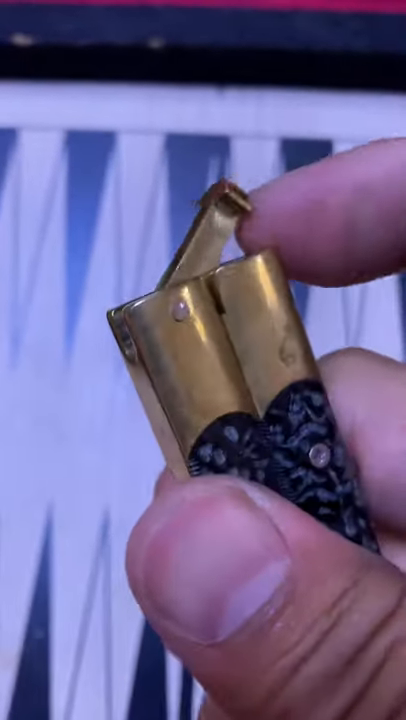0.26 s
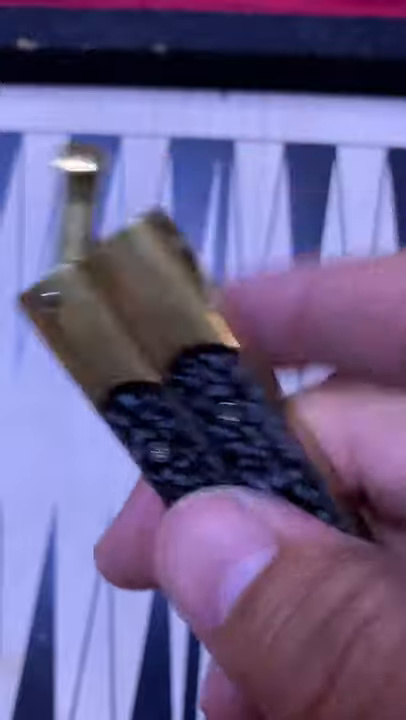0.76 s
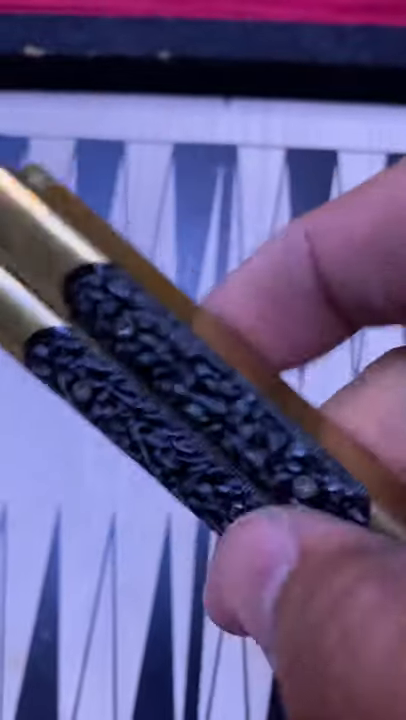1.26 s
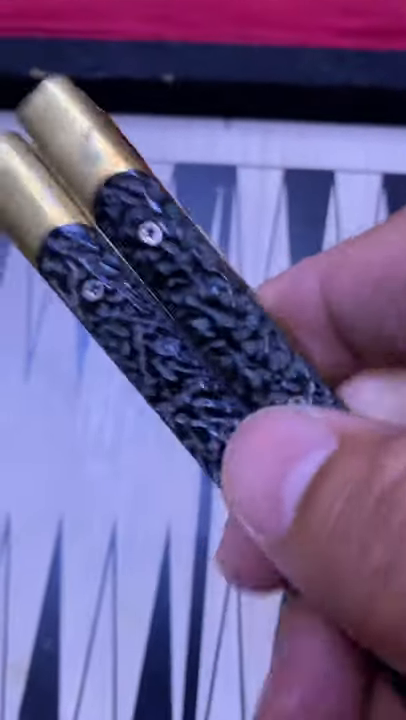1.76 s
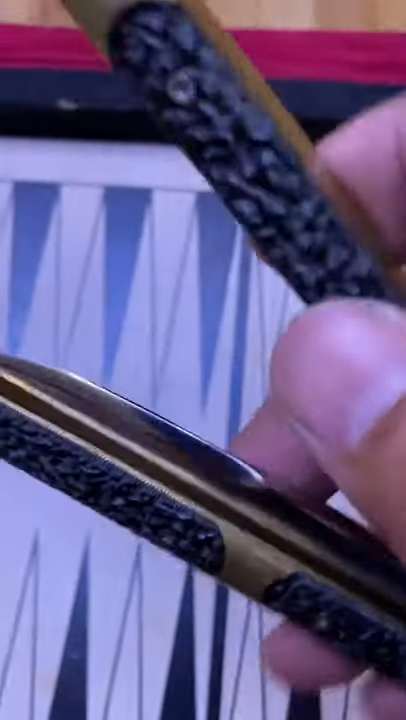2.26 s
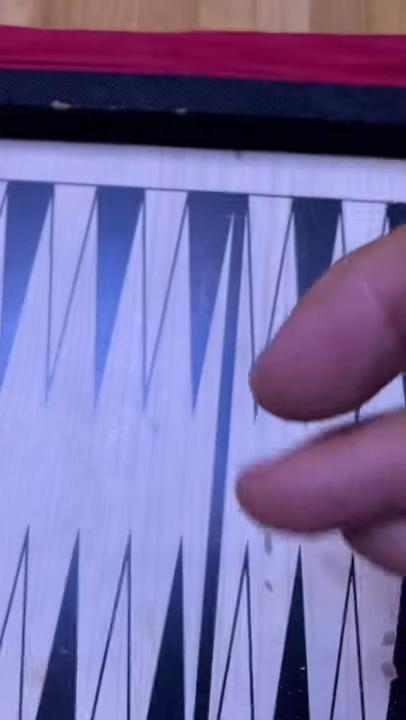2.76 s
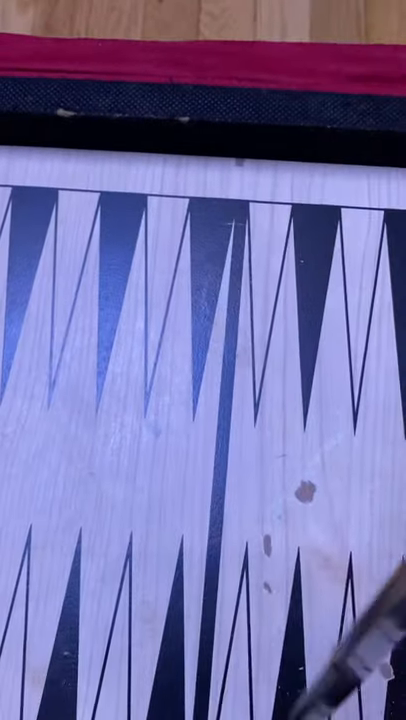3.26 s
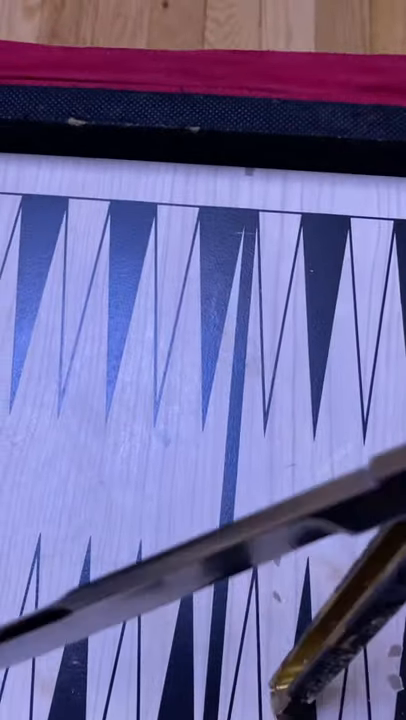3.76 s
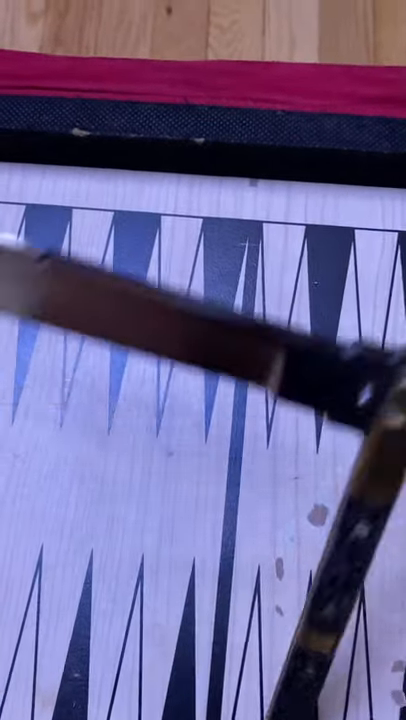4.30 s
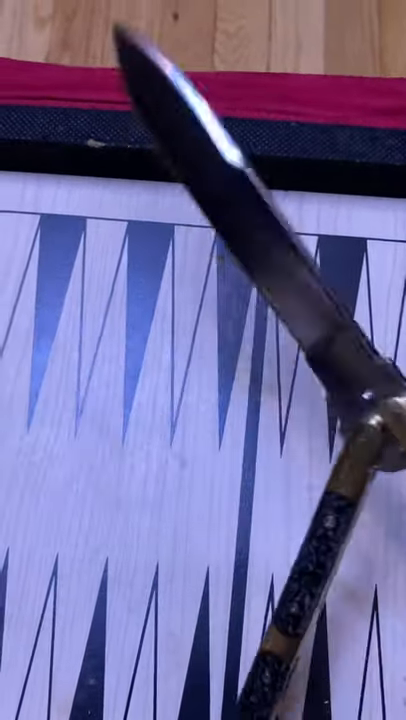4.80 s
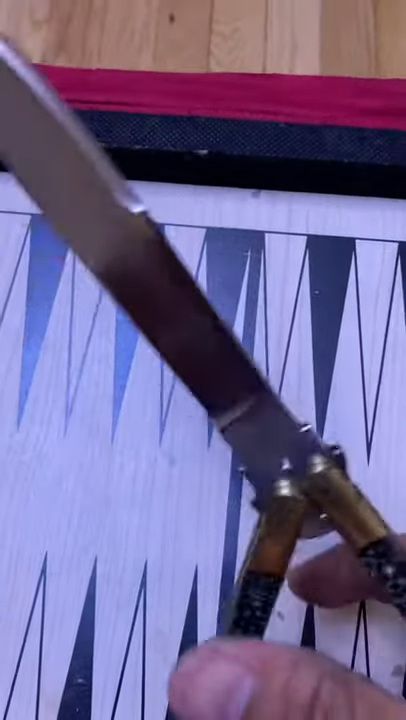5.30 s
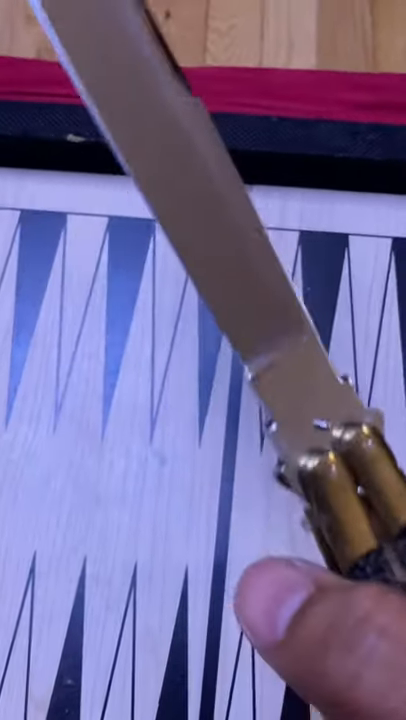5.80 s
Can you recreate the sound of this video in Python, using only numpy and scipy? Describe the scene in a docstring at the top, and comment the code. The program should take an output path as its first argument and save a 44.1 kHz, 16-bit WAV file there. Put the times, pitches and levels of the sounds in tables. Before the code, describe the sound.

A hand opens a metal butterfly knife over a wooden game board. Tiny clicks come first, then a bright snap, a pause, and the loudest hit, metal and wood together. Irregular knocks, jingling pivots and brief drags follow before the handles close with a crisp snap. Close wide stereo handheld microphone, faint room echo, low room air, muffled thuds of the hand on the camera.

```python
"""A low murmur of room air and a soft bump of the hand on the camera, then the latch of a brass-handled
butterfly knife clicks as it is pushed free and the handles part. One handle drops on a wooden game board,
bounces, skids and drags; the handles close behind the open blade. Fingers rub the grip; a small room answers.
Metal and wood are noise bursts and decaying modes, scraping is random slips through resonances,
skin, bumps and air are shaped noise, and the room is sparse random echoes."""
import sys
import numpy as np
from scipy import signal
from scipy.fft import rfft, irfft
from scipy.io import wavfile
from scipy.ndimage import uniform_filter1d

SR = 44100
rng = np.random.default_rng(int(sys.argv[2]) if len(sys.argv) > 2 else 0)


def to_wav(sig):
    """Store sig (one row per channel, or 1-D mono) as 16-bit WAV at the path in sys.argv[1].

    Samples outside -1..1 are clipped; the rate is SR.
    """
    pcm = np.clip(np.atleast_2d(sig), -1, 1) * 32767
    pcm = np.round(pcm).astype(np.int16)
    wavfile.write(sys.argv[1], SR, pcm.T)  # frames by channels


N = 266496  # samples

# Levels in dB are relative; the mix sets the final gains.
# metal clicks: latch freed, handles part, one drops and bounces, pivots rattle, handles close:
# start_s, level_db, brightness_db_per_band, favoured_ring_hz, second_ring_hz, chatter_t60_s
METAL_CLICKS = [ (0.293, -49, 0.5, 11400, 3300, 0.014), (0.2978, -44.5, -3.5, 6570, 3400, 0.013),
                (1.105, -44, 2.5, 12000, 5160, 0.0093), (1.1126, -49.5, -5, 4450, 5500, 0.034),
                (1.157, -53, -0.5, 3970, 5800, .018), (1.167, -51, 3, 5030, 15300, 0.022),
                (1.175, -47, -4.5, 3950, 4900, 0.016), (1.186, -44.5, -1.5, 4100, 5160, 0.012),
                (1.5323, -56, -8.5, 3800, 5100, 0.014), (1.88, -47.5, -5.5, 3930, 5240, .033),
                (1.897, -28, -1, 5450, 3940, 0.017), (1.904, -42, 3.5, 5300, 7060, .012),
                (2.511, -59.5, -5.5, 3450, 4116, .02), (2.548, -56, -3, 9140, 3930, .018),
                (2.626, -58.5, -2, 6630, 8100, 0.012), (2.822, -43, 3, 9030, 10400, 0.011),
                (2.832, -48.5, 4.5, 10100, 11030, 0.016), (3.1622, -21.5, 0, 10370, 6660, 0.02),
                (3.168, -30, 1.5, 6730, 9350, 0.022), (3.1819, -38.5, -2, 10750, 4170, .04),
                (3.281, -48, -0.5, 6740, 8520, 0.015), (3.2865, -53, 3.5, 10200, 8450, 0.028),
                (3.58, -32, 7.5, 10440, 12300, 0.011), (3.587, -39, 2, 8530, 3500, 0.022),
                (3.5915, -38, 6, 10400, 6600, .03), (3.602, -43.5, -2.5, 10460, 6650, .02),
                (3.6325, -52, 1, 8470, 10400, .02), (3.6659, -41.5, 2.5, 8370, 10200, 0.012),
                (3.8557, -36.5, 3, 10410, 8400, 0.023), (4.2757, -57.5, 2.5, 8430, 3980, .015),
                (4.4273, -42.5, 1.5, 7530, 8500, .02), (4.464, -30.5, -0.5, 10400, 5250, 0.01),
                (4.4704, -30.5, 4, 7560, 5170, 0.009), (4.476, -31, 1.5, 12090, 5260, 0.012),
                (4.739, -49, -2, 7000, 5260, 0.014), (4.7476, -38.5, 0.5, 10500, 6980, 0.027),
                (4.876, -36.5, 0, 7640, 4120, 0.022), (4.907, -41, 2.5, 6850, 5330, 0.033),
                (4.927, -43.5, -2.5, 6660, 3960, 0.062), (4.966, -55, 1, 4000, 8470, .02),
                (5.0216, -47, 5.5, 10600, 4070, 0.0095), (5.13, -59, 0, 7000, 5170, 0.011),
                (5.6237, -37, 1.5, 6000, 10700, 0.024), (5.6416, -32.5, -1.5, 7150, 5280, 0.037),
                (5.655, -44.5, -2, 8830, 5270, .02), (5.81, -49.5, 0, 7260, 5900, 0.016),
                (5.8466, -23.5, 2, 6480, 9580, 0.0065)]
# limits of the three click bands: edge_hz
CLICK_EDGES_HZ = [3300, 5800, 9000, 17000]
# level of the low, middle and high band of an even click: level_db
CLICK_BAND_DB = (-1.3, -0.45, 0.1)
# nominal modes of the knife: mode_hz, level_db
KNIFE_MODES = [(3450, -3), (4080, -1), (5250, -4), (6080, -10), (6540, -0.5), (6790, -2), (7560, -3.5),
               (8470, -2), (9450, -2), (10350, 2), (10720, -0.5), (11950, -3.5), (12500, -6), (15200, -7)]
# layers of the board knocks; rows a few ms apart sound as one knock:
# start_s, clack_db, boom_db, clack_centre_hz, spot_ring_db
KNOCK_LAYERS = [(3.1613, -14.5, -44.5, 1720, -14), (3.1625, -19.5, -42, 920, -3),
                (3.165, -23, -29.5, 762, 1), (3.5785, -18.5, -40, 983, -7.5), (3.5795, -27.5, -46, 1600, 0),
                (3.583, -29.5, -28, 737, -4), (3.857, -40.5, -48.5, 850, -5), (4.422, -36.5, -51, 807, -2),
                (4.4647, -27, -34, 1005, -6), (4.468, -33, -50.5, 1600, -0.5),
                (4.4715, -25, -44.5, 683, 16), (4.4769, -42, -32, 677, 4), (4.7403, -28, -40.5, 1024, 3),
                (4.878, -32, -63.5, 850, 8.5), (4.909, -39, -60.5, 1000, 1), (4.929, -36.5, -58, 984, 1.5),
                (4.967, -32.5, -62, 900, 1), (4.982, -32.5, -44.5, 866, -5), (5.129, -37, -57.5, 960, 2)]
# clack modes of the board: mode_hz, level_db, t60_s
CLACK_MODES = [(670, 1.5, 0.14), (769, 5, 0.073), (889, 1.5, .1), (994, 3, 0.086), (1238, -4, 0.14),
               (1440, -6, 0.092), (1555, -4.5, 0.085), (1694, -4, 0.087), (1810, -5.5, .07),
               (2150, -10, .04)]
# hollow boom modes of the board: mode_hz, level_db, t60_s
BOOM_MODES = [(144.5, 2, 0.14), (181, -0.5, 0.064), (275, -3, 0.11), (400, -5, 0.034)]
# hand bumps camera: peak_s, level_db, bell_sigma_s, firmness_db
HAND_BUMPS = [(0.059, -30, .02, -4.5), (0.334, -32, .036, -2), (0.564, -34, .035, 4),
              (0.688, -34.5, 0.016, -14.5), (1.477, -37.5, .027, -4.5), (1.776, -27.5, 0.018, 4.5),
              (2.179, -34.5, .027, 3.5), (2.624, -35.5, 0.026, -16), (3.044, -26, 0.042, -2),
              (3.341, -28, 0.016, 0), (3.641, -29.5, 0.017, 3.5), (3.744, -29.5, .019, -0.5),
              (4.13, -31.5, .025, 2.5), (4.286, -35, 0.017, 4.5), (4.489, -34.5, .019, -2.5),
              (4.646, -31, .021, -2.5), (5.086, -34.5, 0.029, 2)]
# spectrum of a bump: freq_hz, level_db
BUMP_SPECTRUM = [(20, -14), (40, 0.5), (65, 8), (100, -3), (160, -18), (280, -18.5), (420, -39.5),
                 (1000, -37), (3000, -87)]
# handle scrapes board in short pulls: peak_s, level_db, bell_sigma_s, tilt_db_per_octave
DRAG_PULLS = [(4.333, -47.5, 0.055, -2.5), (4.434, -41, 0.039, -3), (4.74, -41, 0.033, 1),
              (4.91, -44, 0.053, 4), (5.028, -43, 0.041, 4), (5.144, -44.5, 0.021, 2)]
# board resonances driven by scraping: centre_hz, width_hz, level_db
SCRAPE_MODES = [(283.7, 32, -12), (668, 42, -9), (812, 63, -6), (1010, 52, -6), (1687, 52, -12.5)]
# fingers slide on grip: peak_s, level_db, bell_sigma_s
FINGER_RUBS = [(.86, -61.5, 0.063), (1.68, -69, 0.086), (2.9, -61.5, 0.034), (3.06, -56.5, 0.02),
               (4.14, -64.5, 0.042), (4.39, -62, .05), (4.81, -60, .04), (5.195, -62, 0.027),
               (5.61, -59.5, 0.022), (6.0, -60.5, 0.17)]
# spectrum of skin on grip: freq_hz, level_db
RUB_SPECTRUM = [(1000, -34), (3000, -10), (4000, 8.5), (5200, -4.5), (7000, 3), (9000, 4.5), (11000, 3),
                (13500, -2), (16000, -1.5)]
# spectrum of still room air: freq_hz, density_db_per_hz
AIR_SPECTRUM = [(20, -20.5), (65, -0.5), (110, -13.5), (190, -16.5), (290, -6), (420, -15.5), (620, -18),
                (780, -10), (1000, -19.5), (1500, -19.5), (2300, -27), (3200, -33.5), (5000, -43.5),
                (8000, -46), (15000, -55)]
# decay of the room: freq_hz, t60_s
ROOM_DECAY = [(150, 0.43), (1000, 0.32), (5000, 0.42), (12000, 0.46), (16000, 0.17)]
# spectrum of the room's echoes: freq_hz, level_db
ROOM_SPECTRUM = [(150, -14), (700, -3.5), (1500, -1.5), (2500, -4), (3900, -1.5), (4700, -2.5),
                 (5900, -5.5), (6700, -1), (7800, -5), (10500, -8), (12600, -13.5), (14000, -11)]
# phase between the two microphone ports: freq_hz, left_lead_rad
PORT_LEAD = [(95, -2.5), (135, -0.7), (320, -0.85), (550, -2), (1000, -2.5), (2500, -2.5), (3300, -2.5),
             (4000, -4), (5500, -2.5), (7000, -1.7), (8300, 0), (10000, 1.24), (11500, 3.0), (12700, 4),
             (14300, 5)]
# likeness of diffuse sound at the two ports: freq_hz, likeness_0_to_1
PORT_COHERENCE = [(60, 0.82), (200, 0.78), (300, 0.21), (700, 0.27), (1500, 0.58), (3000, 0.86),
                  (4000, 0.14), (5500, 0.98)]
# level of the left port over the right: freq_hz, difference_db
PORT_LEVEL_DIFFERENCE = [(60, -0.4), (170, -0.8), (350, 1), (640, -2.5), (1300, -0.7), (9000, 0.1)]
# hollow tocks of a struck handle: start_s, level_db, pitch_hz
HANDLE_TOCKS = [(0.297, -45, 2120), (1.107, -55, 2140), (1.896, -54, 2270), (2.511, -55.5, 1930),
                (2.823, -51, 1914), (3.857, -45, 2150), (4.465, -36, 2200), (5.624, -45, 2130),
                (5.643, -43.5, 2170), (5.847, -39, 1970)]
# squeal of the skidding handle: time_s, pitch_hz, level_db
SKID_PATH = [(3.175, 1558, -43), (3.2, 1446, -39.5), (3.222, 1301, -41), (3.238, 1427, -38),
             (3.252, 1412, -40.5), (3.285, 1380, -54.5)]

AIR_DB = -52.5
FAVOUR_DB = 5.5  # extra level of the band that holds the favoured ring
REBOUND_MIN_S, REBOUND_MAX_S, REBOUND_DB = 0.008, 0.021, -17.5
LEAD_IN_S, LEAD_IN_DB = 0.0046, -22
FIRM_HZ = 124  # firmness acts above this
GRIP_DETUNE = 0.008  # standard deviation, share of mode pitch
SPOT_DB = 2.5  # standard deviation of mode level from click to click


def amp(db):
    """Amplitude ratio from dB."""
    return 10 ** (np.asarray(db) / 20)


def rms(x):
    """Root mean square, kept above zero."""
    return np.sqrt(np.mean(x ** 2) + 1e-20)


def unit(x):
    """x at rms 1."""
    return x / rms(x)


def read(points, hz):
    """A table over frequency, joined on a log axis."""
    freq_hz, value = np.transpose(points)
    return np.interp(np.log(hz + 1), np.log(freq_hz + 1), value)


def add(mix, start_s, sound):
    """Adds sound to mix in place, cut at the end of mix."""
    part = mix[max(round(start_s * SR), 0):][:len(sound)]
    part += sound[:len(part)]


def colour(x, spectrum):
    """Multiplies the spectrum of x by a table, at rms 1."""
    gain = amp(read(spectrum, np.fft.rfftfreq(N, 1 / SR)))
    return unit(irfft(rfft(x) * gain, N))


def band(x, lo_hz, hi_hz, order=3):
    """Butterworth band-pass."""
    edges_hz = [lo_hz, min(hi_hz, SR / 2 - 1)]
    return signal.sosfilt(signal.butter(order, edges_hz, "band", fs=SR, output="sos"), x)


def low_pass(hz):
    """Second-order low-pass sections."""
    return signal.butter(2, hz, fs=SR, output="sos")


def around(x, hz, width_hz):
    """A damped resonance."""
    return signal.lfilter(*signal.iirpeak(hz, hz / width_hz, fs=SR), x)


def gliding(x, hz, width_hz):
    """A damped resonance that follows the pitch curve hz: shift to 0 Hz, smooth, shift back."""
    turn = np.exp(2j * np.pi * np.cumsum(hz) / SR)
    r = np.exp(-np.pi * width_hz / SR)
    return (turn * signal.lfilter([1 - r], [1, -r], x / turn)).real


def ring(modes, t, scatter_db):
    """Decaying modes; random shares stand for where the blow lands."""
    hz, db, t60_s = np.transpose(modes)[:, :, None]
    share_db, phase_turns = rng.standard_normal((2, len(modes), 1))
    level = amp(db + scatter_db * share_db - 60 * t / t60_s)
    return (level * np.sin(2 * np.pi * (hz * t + phase_turns))).sum(0)


def onset(t, rise_s):
    """Smooth rise from 0 to 1."""
    return 1 - np.exp(-(t / rise_s) ** 2)


def contact(t, hold_s, t60_s):
    """Two surfaces chatter as noise for hold_s, then settle exponentially."""
    decay = np.exp(-np.log(1000) * np.maximum(t - hold_s, 0) / t60_s)
    return rng.standard_normal(len(t)) * decay


def swells(rows):
    """Gain over time: each movement is a bell curve, overlaps add in power."""
    t = np.arange(N) / SR
    bells = [amp(db) * np.exp(-((t - peak_s) / sigma_s) ** 2 / 2) for peak_s, db, sigma_s in rows]
    return np.sqrt(sum(bell ** 2 for bell in bells))


def ports(x, other=None):
    """Left and right ports hear x out of phase; diffuse sound also has an unrelated part."""
    hz = np.fft.rfftfreq(N, 1 / SR)
    right = rfft(x)
    if other is not None:
        same = np.clip(read(PORT_COHERENCE, hz), 0, 1)
        right = same * right + np.sqrt(1 - same ** 2) * rfft(other)
    return np.array([x, irfft(right * np.exp(-1j * read(PORT_LEAD, hz)), N)])


def air():
    """Still room air: steady shaped noise, diffuse at the ports."""
    return amp(AIR_DB) * ports(*colour(rng.standard_normal((2, N)), AIR_SPECTRUM))


def thumps():
    """Each shift of the hand sends a dull shudder through the camera body; firm ones reach higher."""
    shudder = colour(rng.standard_normal((2, N)), BUMP_SPECTRUM)
    shudder /= np.sqrt(uniform_filter1d((shudder ** 2).mean(0), size=1500))  # evens out the level
    deep = signal.sosfiltfilt(low_pass(FIRM_HZ), shudder)
    push = swells([(s, db, sigma_s) for s, db, sigma_s, _ in HAND_BUMPS])
    firm = swells([(s, db + firm_db, sigma_s) for s, db, sigma_s, firm_db in HAND_BUMPS])
    return ports(*(push * deep + firm * (shudder - deep)))


def click_parts():
    """Each click is a faint lead-in, the click itself, and a weaker rebound a random moment later."""
    rows = []
    for (s, db, *tone), (wait, loss) in zip(METAL_CLICKS, rng.random((len(METAL_CLICKS), 2))):
        rebound_s = s + REBOUND_MIN_S + wait * (REBOUND_MAX_S - REBOUND_MIN_S)
        rebound_db = db + REBOUND_DB * (1 + 0.5 * loss)
        rows += [(s - LEAD_IN_S, db + LEAD_IN_DB, *tone), (s, db, *tone), (rebound_s, rebound_db, *tone)]
    return rows


def clicks(hardness_hz=15500, mode_width_hz=300):
    """Metal chatters through the knife's modes, favouring two: (direct sound, sound sent to the room)."""
    t, out = np.arange(SR // 12) / SR, np.zeros((2, N))
    attack = t < 0.005
    bands = list(zip(CLICK_EDGES_HZ, CLICK_EDGES_HZ[1:]))
    rise = onset(t, rise_s=0.0011)

    def struck(x):
        """x at rms 1 over the attack."""
        return x / rms(x[attack])

    for s, level_db, bright_db, hz, second_hz, t60_s in click_parts():
        levels_db = [level_db + CLICK_BAND_DB[k] + bright_db * (k - 1) + FAVOUR_DB * (lo <= hz < hi)
                     for k, (lo, hi) in enumerate(bands)]
        chatter = contact(t, hold_s=0.0018, t60_s=t60_s) * rise
        steel = np.zeros(len(t))
        for (mode_hz, db), (spot, grip) in zip(KNIFE_MODES, rng.standard_normal((len(KNIFE_MODES), 2))):
            gripped_hz = mode_hz * (1 + GRIP_DETUNE * grip)
            steel += amp(db + SPOT_DB * spot) * around(chatter, gripped_hz, mode_width_hz)
        snap = struck(band(chatter, 1200, hardness_hz, order=4))
        crack = struck(steel) + amp(-7.5) * snap

        tap = contact(t, hold_s=0.00054, t60_s=0.011) * rise
        first_ring = struck(around(tap, hz, width_hz=130))
        second_ring = struck(around(tap, second_hz, width_hz=110))
        favoured = first_ring + amp(-5.5) * second_ring
        strike = crack + amp(0.5) * favoured
        # summed over all directions the modes even out
        scattered = crack + 0.5 * snap + amp(-11) * favoured

        # the low ring also shakes the grip
        body = band(contact(t, hold_s=0.00089, t60_s=0.025) * rise, 1700, 3900, order=2)
        add(out[0], s, amp(levels_db[0] - 19.0) * struck(body))
        for db, (lo_hz, hi_hz) in zip(levels_db, bands):
            for path, part in zip(out, band([strike, scattered], lo_hz, hi_hz, order=4)):
                add(path, s, amp(db) * struck(part))
    return out


def room(x, rise_s=0.0028, echoes_per_s=5000):
    """Sparse reflections that die at a speed set by frequency."""
    sparse = rng.random((2, SR)) < echoes_per_s / SR
    taps = rng.standard_normal((2, SR)) * sparse * onset(np.arange(SR) / SR, rise_s)
    hz, t, z = signal.stft(taps, SR, nperseg=256)
    decay = np.exp(-np.log(1000) * t / read(ROOM_DECAY, hz)[:, None])
    z *= amp(read(ROOM_SPECTRUM, hz))[:, None] * decay
    tail = signal.istft(z, SR, nperseg=256)[1]
    tail /= np.linalg.norm(tail[0])
    return ports(*signal.fftconvolve(x[None], tail, axes=1)[:, :N])


def tocks():
    """The hollow handle takes the blow and rings briefly, damped by the hand."""
    t, out = np.arange(SR // 12) / SR, np.zeros(N)
    for s, db, hz in HANDLE_TOCKS:
        blow = contact(t, hold_s=0.0015, t60_s=0.072)
        tock = around(around(blow, hz, width_hz=410), hz, width_hz=380)
        add(out, s, amp(db) * tock / rms(tock[t < 0.005]))
    return out


def rub(grain_db=2.2):
    """Skin hisses on the grip, catching in quick grains under a pressure that varies more slowly."""
    catch = unit(uniform_filter1d(rng.standard_normal(N), size=200))
    pressure = unit(uniform_filter1d(rng.standard_normal(N), size=1800))
    hiss = rng.standard_normal(N) * amp(grain_db * (catch + 0.5 * pressure))
    return swells(FINGER_RUBS) * colour(hiss, RUB_SPECTRUM)


def knocks(ring_t60_s=0.054, reach=1.72):
    """The board clacks around each layer's pitch and rings at it; its hollow boom rises more slowly."""
    t, out = np.arange(SR // 3) / SR, np.zeros(N)
    early, late = t < 0.006, t < 0.03
    for s, clack_db, boom_db, hz, ring_db in KNOCK_LAYERS:
        chatter = band(contact(t, hold_s=0.0013, t60_s=0.022), 340, reach * hz, order=2)
        blow = around(chatter, hz, width_hz=0.58 * hz)
        modes = around(ring(CLACK_MODES, t, scatter_db=2.5), hz, width_hz=0.56 * hz)
        spot = ring([(hz, 0, ring_t60_s)], t, scatter_db=0)
        clack = unit(blow) + amp(-2.5) * unit(modes) + amp(ring_db) * unit(spot)
        clack *= onset(t, rise_s=0.0014)
        boom = ring(BOOM_MODES, t, scatter_db=1) * onset(t, rise_s=0.004)
        add(out, s, amp(clack_db) * clack / rms(clack[early]) + amp(boom_db) * boom / rms(boom[late]))
    return out


def skid(width_hz=120):
    """Brass sticks and slips on the varnish: a rough squeal, narrow noise on a wandering pitch."""
    t, (s, hz, db) = np.arange(N) / SR, np.transpose(SKID_PATH)
    rough = signal.sosfilt(low_pass(width_hz / 2), rng.standard_normal((2, N)))
    turn = 2 * np.pi * np.cumsum(np.interp(t, s, hz)) / SR
    level = amp(np.interp(t, s, db)) * (t > s[0]) * (t < s[-1])
    return level * unit(rough[0] * np.cos(turn) + rough[1] * np.sin(turn))


def drag(slips_per_s=460, spread_db=3.7, grit_db=-16.5, drift=0.025):
    """Tiny slips of brass on wood ring board resonances that wander with the handle, plus dry grit."""
    size = amp(spread_db * np.minimum(rng.exponential(1, N), 3))
    slips = unit((rng.random(N) < slips_per_s / SR) * rng.choice([-1, 1], N) * size)
    slips += 0.29 * rng.standard_normal(N)
    grit = unit(band(slips, 1050, 3000, order=3))
    out = amp(grit_db) * swells([row[:3] for row in DRAG_PULLS]) * grit
    for hz, width_hz, mode_db in SCRAPE_MODES:
        octaves = np.log2(hz / 1000)  # tilt pivots at 1 kHz
        pulls = swells([(s, db + mode_db + tilt_db * octaves, sigma_s)
                        for s, db, sigma_s, tilt_db in DRAG_PULLS])
        wander = unit(uniform_filter1d(rng.standard_normal(N), size=6000))
        mode = gliding(slips, hz * (1 + drift * wander), width_hz)
        out += pulls * unit(around(mode, hz, hz / 2))
    return out


def scene():
    """The knife and the board near by, the room behind them."""
    metal, scattered = clicks()
    wood = amp(-1.0) * knocks() + amp(3.5) * drag() + skid()
    handle = tocks()
    near = amp(0.1) * metal + handle + wood + rub()
    far = amp(-20.5) * scattered + amp(-16.8) * wood + amp(-21.0) * handle
    return ports(near) + room(far) + amp(-2.0) * thumps() + air()


def record(dry):
    """Port balance varies with frequency; loud peaks are rounded off; then a 16.1 kHz low-pass."""
    lean_db = read(PORT_LEVEL_DIFFERENCE, np.fft.rfftfreq(N, 1 / SR)) / 2
    heard = irfft(rfft(dry) * amp([lean_db, -lean_db]), N)
    edge = signal.firwin(255, 16100, window=("kaiser", 9), fs=SR)
    return signal.oaconvolve(np.tanh(heard), edge[None], "same")


dry = scene()
out = record(dry)
to_wav(out)
```